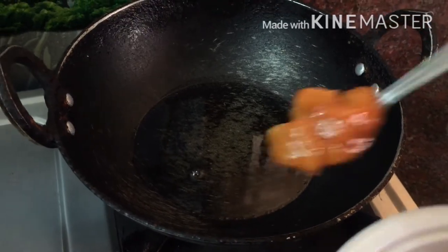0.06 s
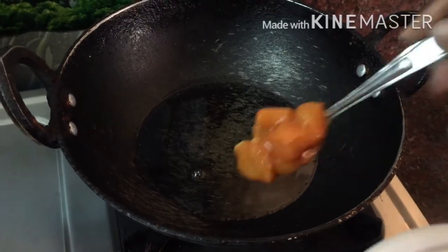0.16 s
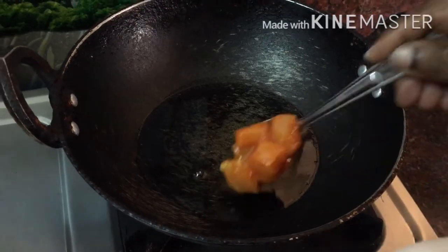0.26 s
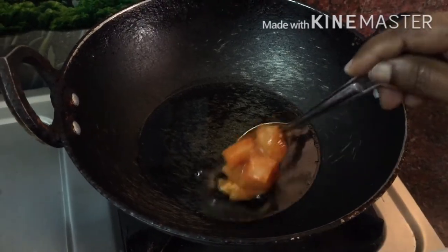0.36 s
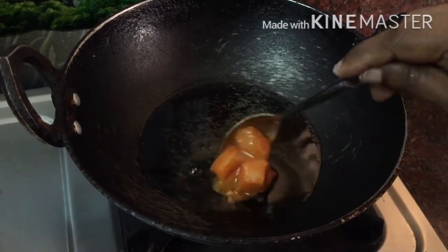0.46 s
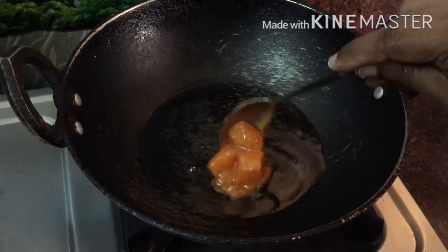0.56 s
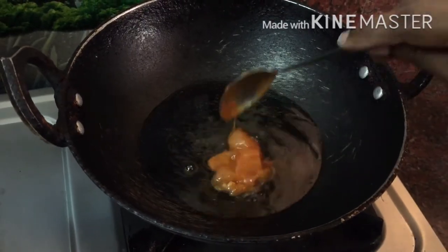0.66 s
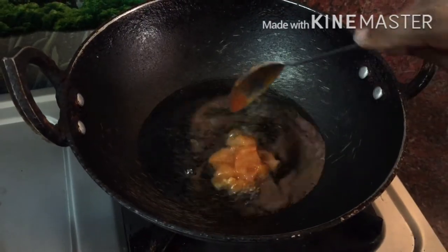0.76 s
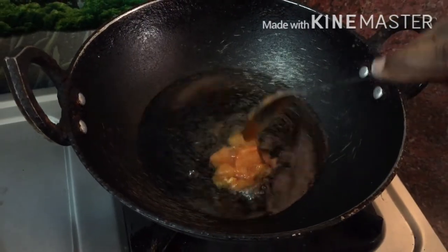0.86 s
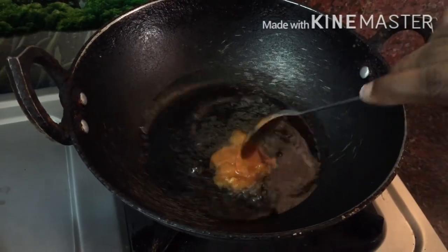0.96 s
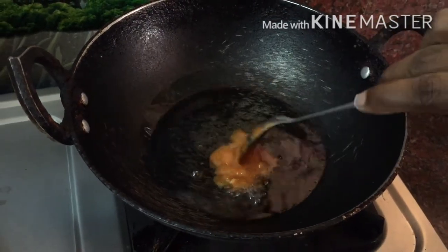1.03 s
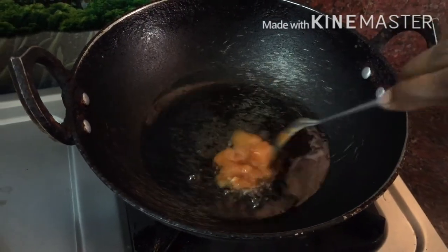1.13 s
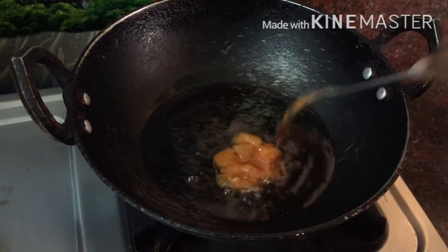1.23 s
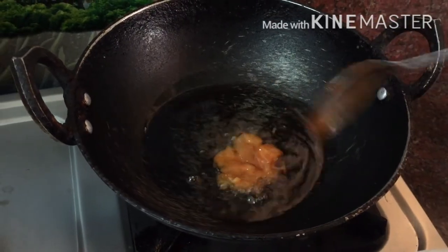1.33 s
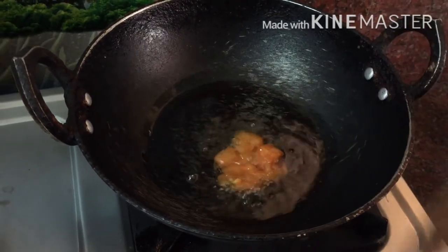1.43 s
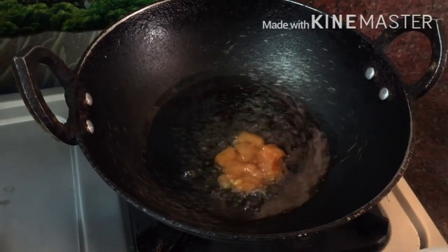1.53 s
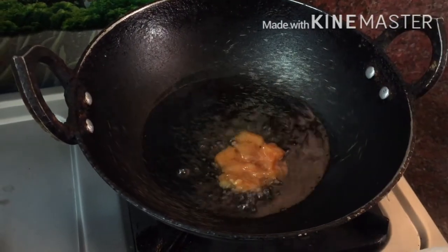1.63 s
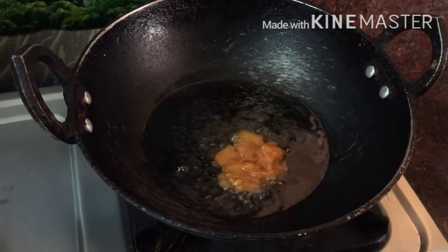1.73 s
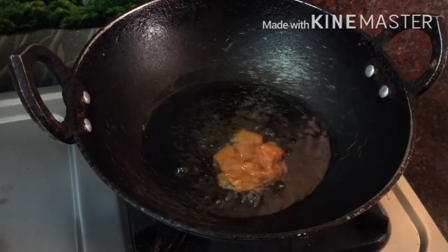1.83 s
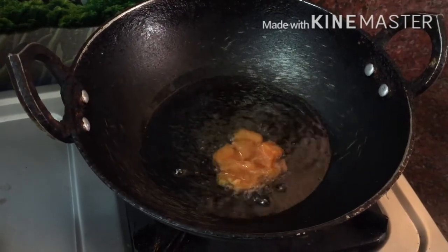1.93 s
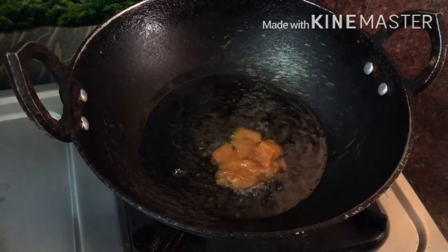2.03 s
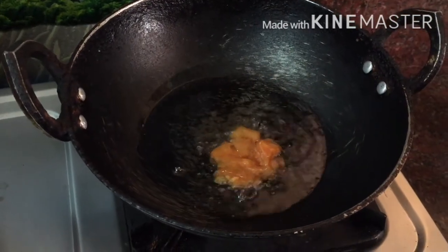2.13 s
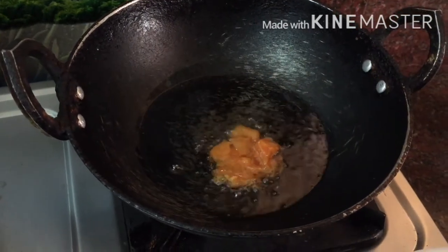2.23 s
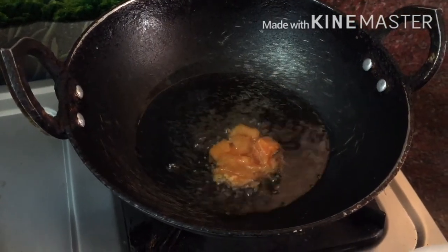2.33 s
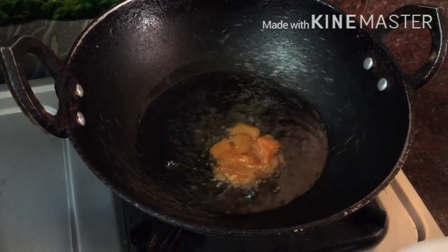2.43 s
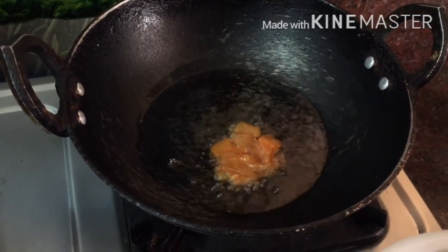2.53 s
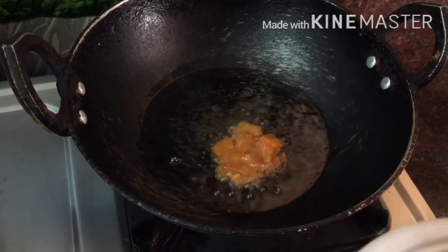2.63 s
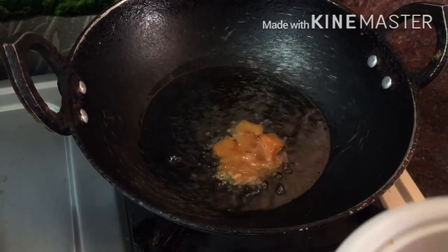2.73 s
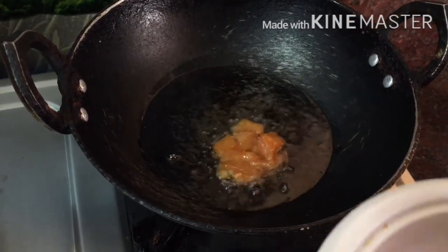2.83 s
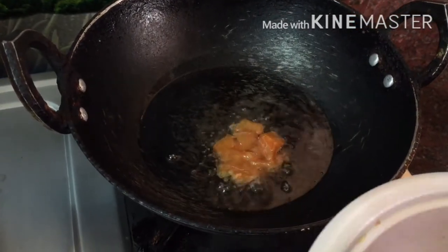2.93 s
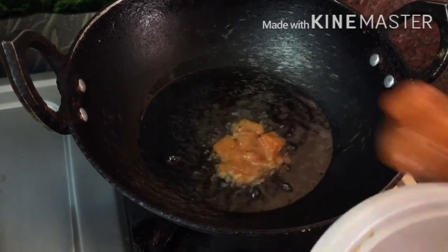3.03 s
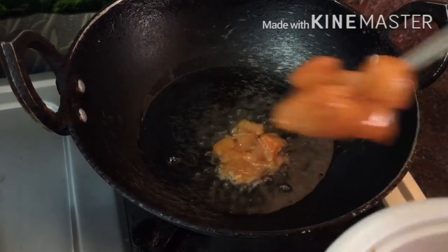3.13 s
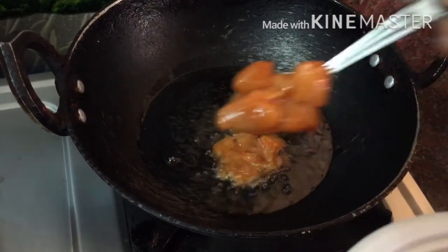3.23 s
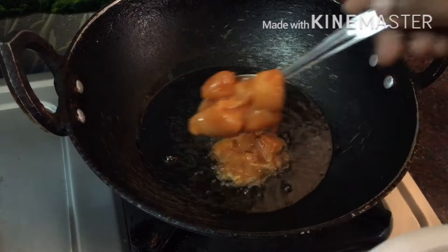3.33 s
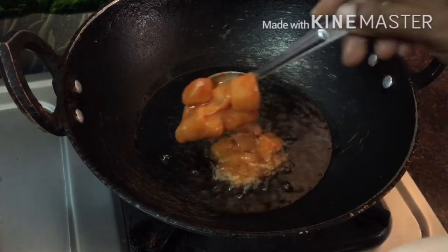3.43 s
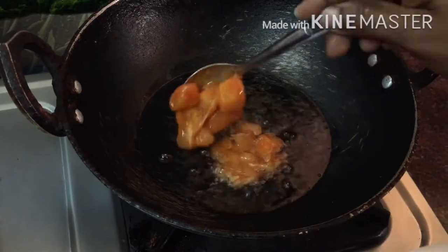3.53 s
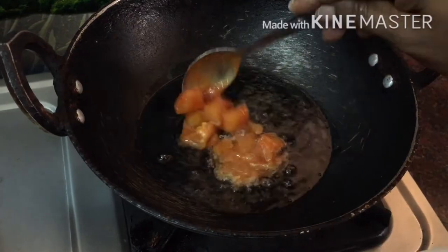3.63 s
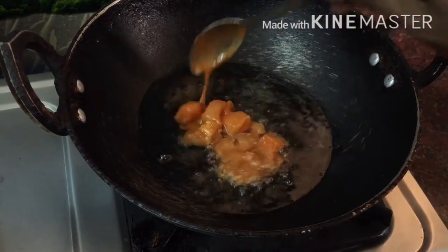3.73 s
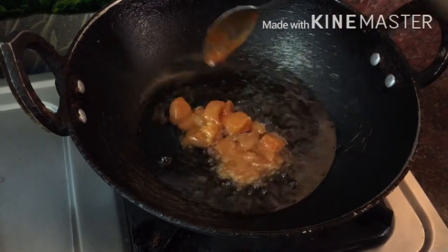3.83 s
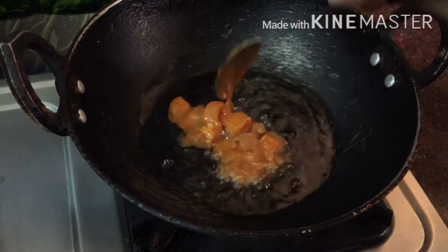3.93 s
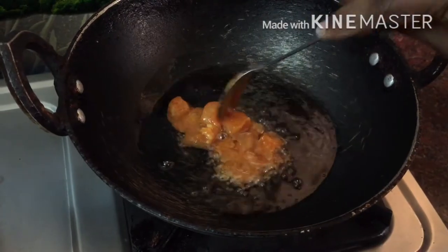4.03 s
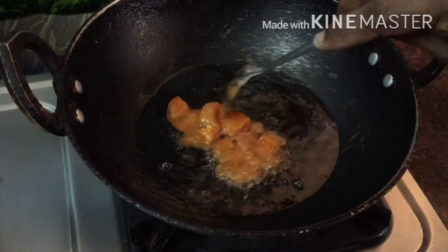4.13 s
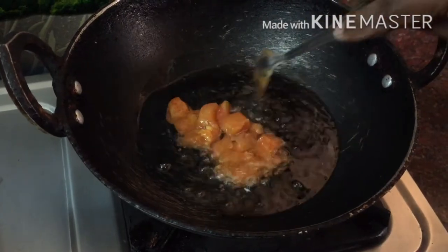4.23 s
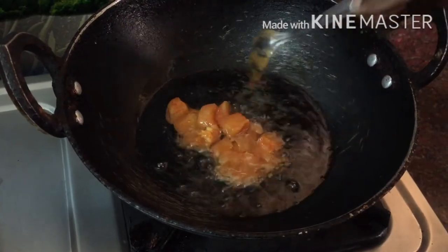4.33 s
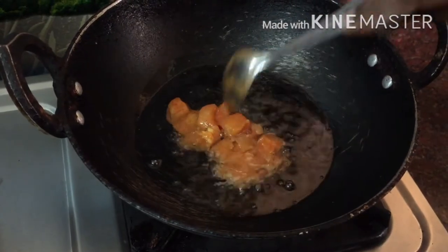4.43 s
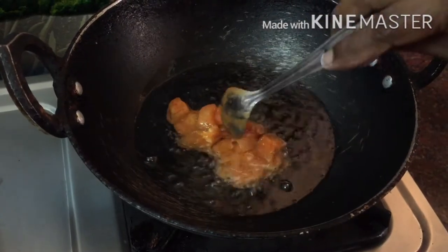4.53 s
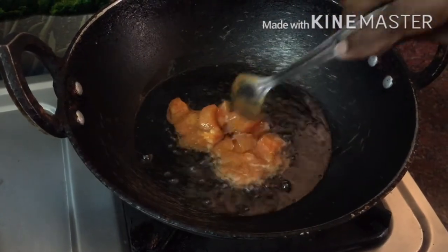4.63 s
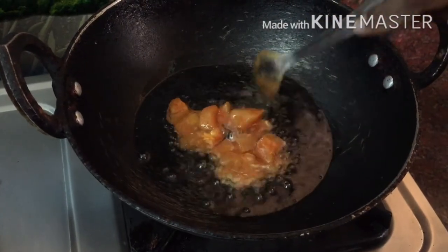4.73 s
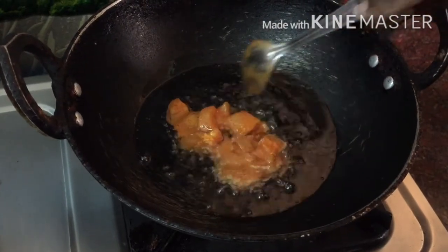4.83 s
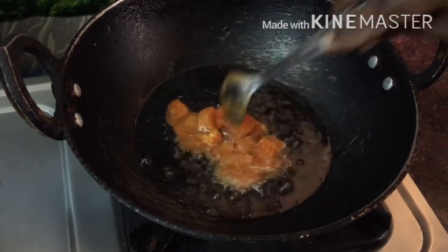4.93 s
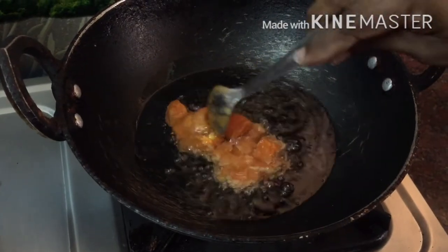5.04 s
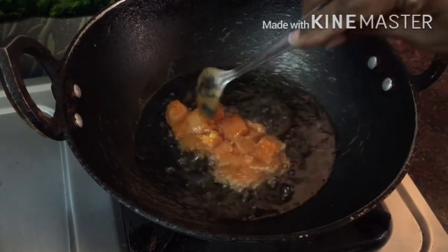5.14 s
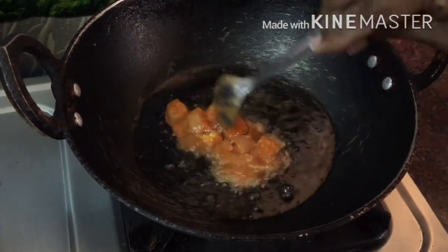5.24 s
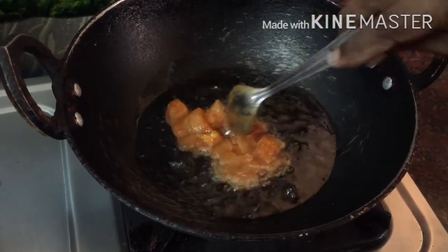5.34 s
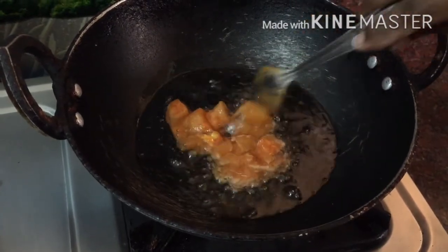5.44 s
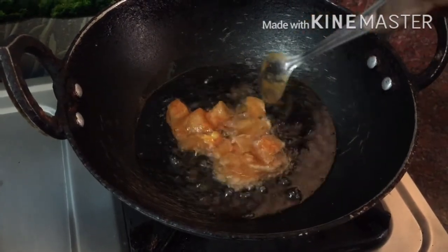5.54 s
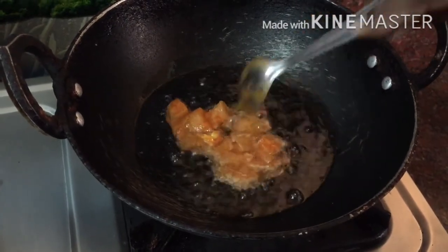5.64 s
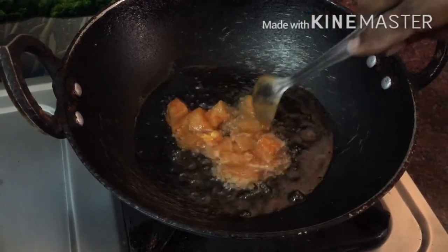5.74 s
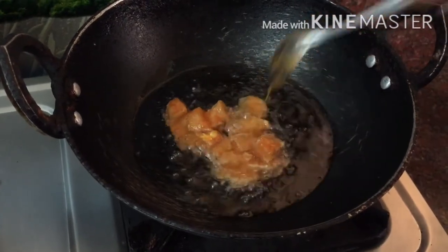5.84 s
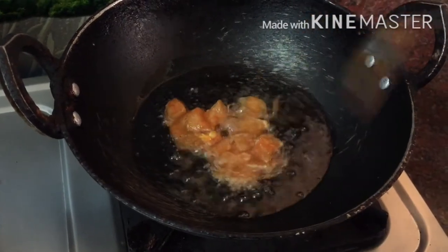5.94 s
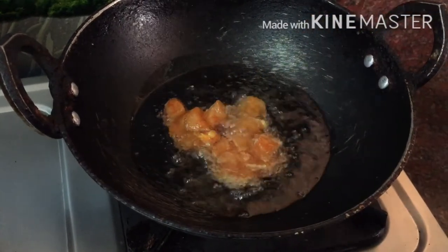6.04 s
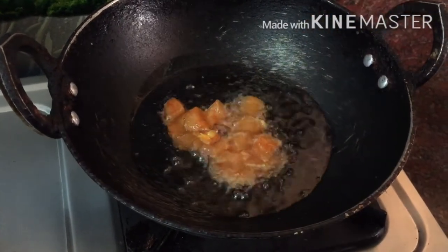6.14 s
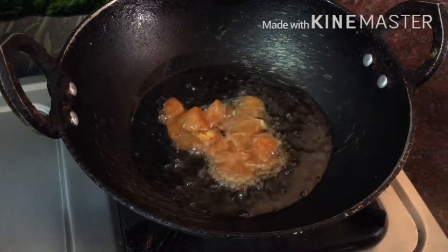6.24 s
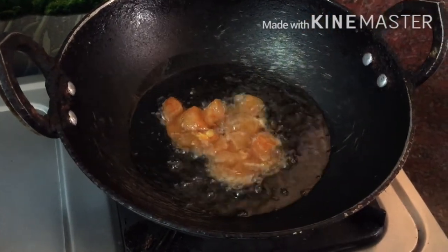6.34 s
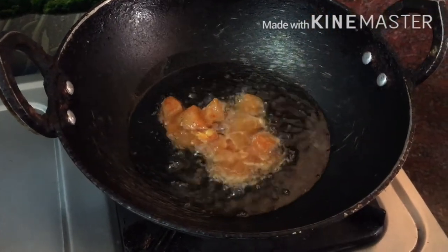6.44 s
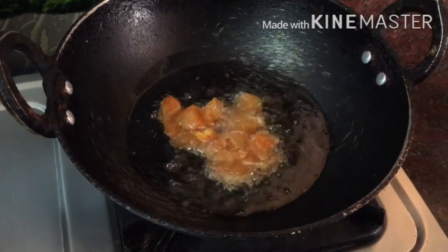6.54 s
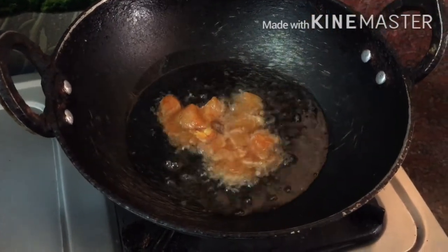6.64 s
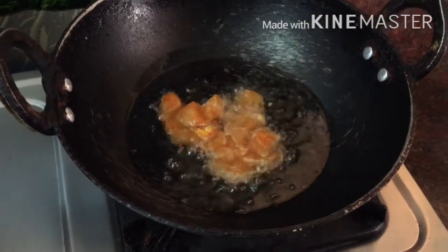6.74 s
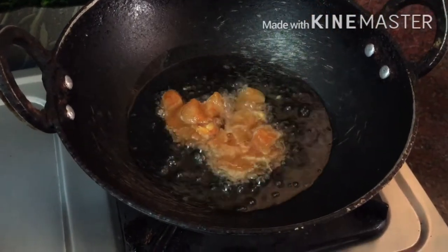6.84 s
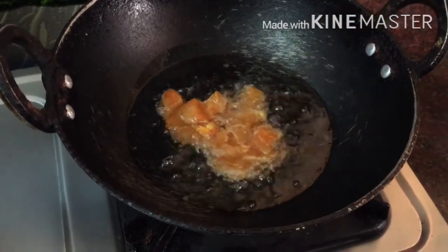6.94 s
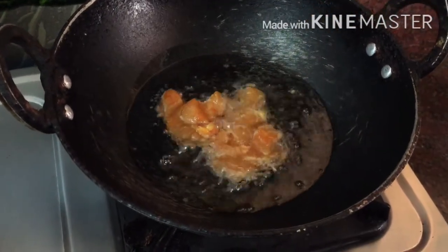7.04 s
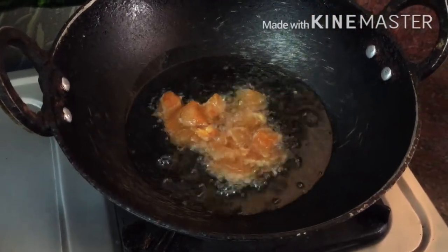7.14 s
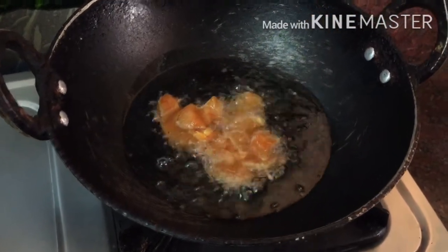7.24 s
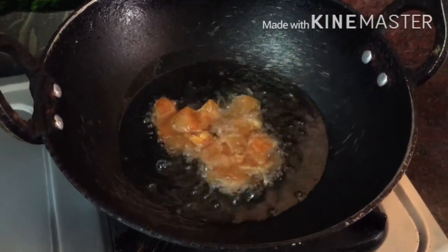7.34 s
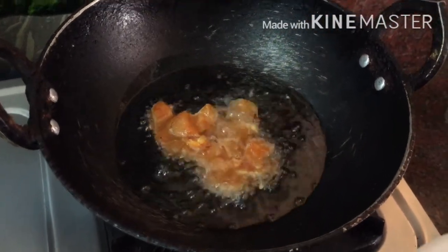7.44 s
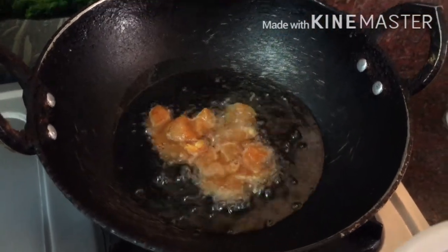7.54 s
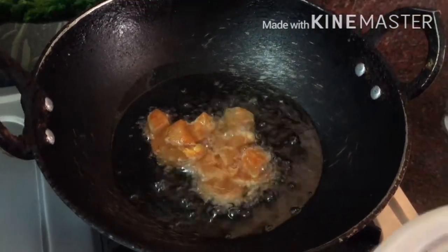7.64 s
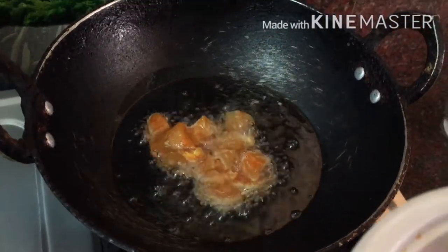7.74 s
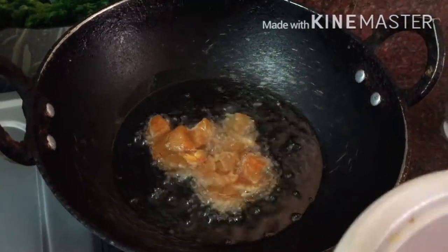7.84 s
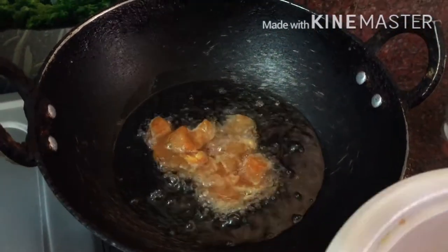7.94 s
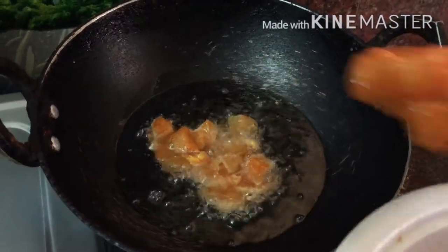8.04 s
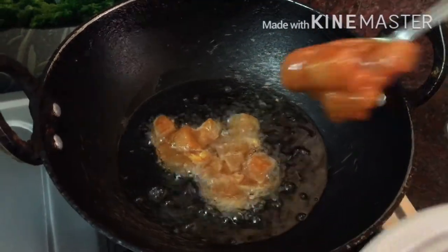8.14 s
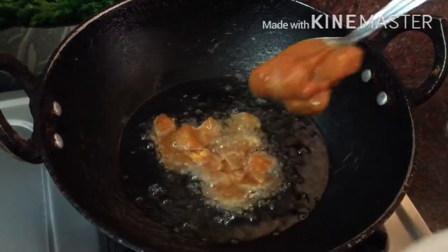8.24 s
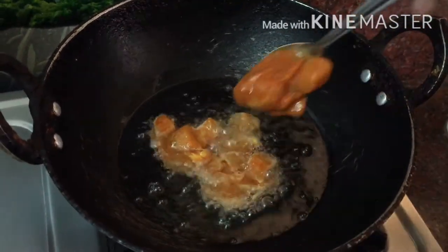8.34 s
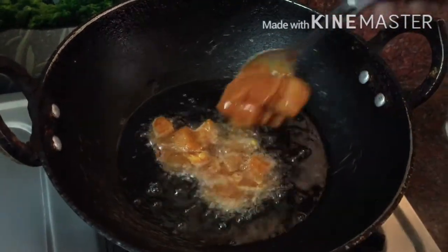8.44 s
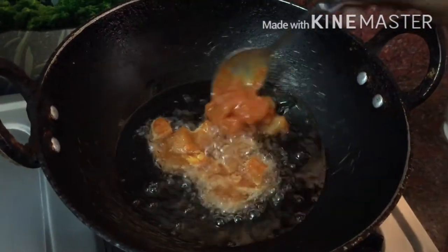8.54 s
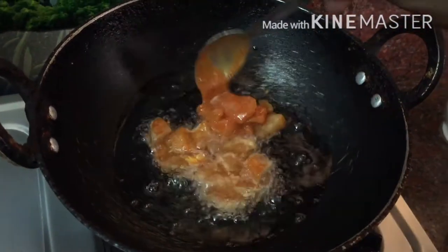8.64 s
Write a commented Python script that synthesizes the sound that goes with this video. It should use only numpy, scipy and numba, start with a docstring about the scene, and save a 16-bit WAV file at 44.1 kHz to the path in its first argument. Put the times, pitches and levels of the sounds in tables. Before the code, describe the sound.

Battered chicken slides into hot oil with a bright rush of sizzling, then the frying crackles and pops harder as the crust dries, over a low drone.

```python
"""Battered chicken frying in a wok

Spoonfuls of battered chicken slide into hot oil in an iron wok, in a small kitchen with a low drone.
The sizzle is a swarm of bursting bubbles: fine ones build up first and fade fastest, so its pitch sinks.
Pops are short bursts with a splash, more and louder as the crust dries; short tones glide in between.
A steel spoon scrapes (stick-slip clicks) and knocks (bouncing clacks) in a bowl, heard through resonances."""
import sys
import numpy as np
from scipy import signal
from scipy.fft import rfft, irfft
from scipy.io import wavfile
from numba import njit

SR = 44100
rng = np.random.default_rng(int(sys.argv[2]) if len(sys.argv) > 2 else 0)


def pcm_store(signal):
    """Save signal as 16-bit PCM."""
    levels = np.round(np.clip(np.atleast_2d(signal), -1, 1) * 32767)
    wavfile.write(sys.argv[1], SR, levels.astype(np.int16).T)


N = 382788
TIME = np.arange(N) / SR
CUTOFF_HZ = 16200   # top of the soundtrack's band
USUAL_DB = -44.5   # steam level at which bubbles burst at their listed rate

# Four bubble sizes, large to fine:
# (lowest pitch [Hz], highest pitch [Hz], bursts [1/s], strength spread [dB], ring [cycles])
BUBBLE_SIZES = [(291.5, 1077, 1000, 1, 9.8), (1094, 2450, 1700, 3, 9.2), (2427, 7070, 3800, 5, 12.6),
                (7360, 15700, 5200, 6, 17)]
# Strength of the bursts over pitch: (pitch [Hz], level [dB])
BURST_COLOUR = [(310, -6), (400, -6), (490, -12), (650, -1.5), (800, -5), (1050, -2.5), (1450, 1.5),
                (1750, 3), (2300, -5), (2700, 7.5), (3300, 3.5), (4300, 4), (5300, -1), (6600, 9),
                (8500, -3), (11500, -2), (15500, -4)]
# Pitch near which each size rings loudest:
# (time [s], large [Hz], medium [Hz], small [Hz], fine [Hz])
FAVOURED_PITCH = [(0.521, 1135, 2302, 4320, 8020), (.64, 1130, 1630, 3840, 7900),
                  (.8, 960, 1790, 3220, 8050), (1.5, 910, 1720, 4200, 7250), (3.5, 666, 2160, 3880, 10200),
                  (3.8, 686, 1700, 4540, 7900), (4.15, 990, 1350, 4750, 8450), (5.3, 750, 1440, 5000, 8350),
                  (5.9, 1020, 1380, 4600, 10000), (7.6, 420, 1290, 5670, 9300)]
# Bubbles need time to grow, so the lowest full-strength pitch slides down: (time [s], pitch [Hz])
LOWEST_PITCH = [(.5, 3100), (.62, 1470), (.72, 830), (1.1, 670), (1.7, 587), (2.6, 363), (5.5, 324)]


def sizzle(clump_db=3.5, flutter_db=1.38, crowding=.7, focus_db=7, focus_octaves=0.21,
           wander_octaves=0.13, rise=0.029, wall_db=-1.5, wall_t60=0.031, count=6):
    """Bubbles of four sizes burst at several spots in the pan; more steam means more of them."""
    spots = np.zeros((count, N))
    lowest_hz = in_time(LOWEST_PITCH)[0]
    for level_db, favoured_hz, bubble in zip(steam(), in_time(FAVOURED_PITCH), BUBBLE_SIZES):
        low_hz, high_hz, per_s, spread_db, cycles = bubble
        rate = per_s * from_db(crowding * (np.maximum(level_db, -55) - USUAL_DB))
        chance = rng.random((5, N))
        at = np.flatnonzero(chance[0] < rate / SR)
        pitch, strength, sign, place = chance[1:, at]
        hz = low_hz * (high_hz / low_hz) ** pitch
        # bubbles near the favoured, wandering pitch are lifted
        off_octaves = np.log2(hz / favoured_hz[at]) + wander_octaves * drift(14)[at]
        nearness = 1 / (1 + (off_octaves / focus_octaves) ** 2)
        focus = 1 + (from_db(focus_db) - 1) * nearness
        # silent below three quarters of the lowest pitch
        grown = np.clip(1 + 4 * (hz / lowest_hz[at] - 1), 0, 1)
        luck_db = spread_db * np.minimum(-np.log(1 - strength), 4.2)
        size = from_db(at_hz(BURST_COLOUR, hz) + luck_db) * np.sign(sign - .5)
        size = size * focus * grown * np.sqrt(hz / rate[at])
        spot = (place * count).astype(np.int64)
        swarm = bubble_rings(at, spot, size, hz, cycles / hz, float(rise), spots.shape)
        swarm = butter(swarm, 0.59 * low_hz, "high", order=4)
        swarm = butter(swarm, 2.33 * high_hz, "low", order=4)
        spots += from_db(level_db) * rms_one(swarm)
    heard = sum(scatter(spot, wall_db, wall_t60)[:N] for spot in spots)
    heard = heard * from_db(clump_db * drift(170) / 2 + flutter_db * drift(30))
    return rms_one(heard) * np.std(spots)


@njit
def bubble_rings(at, spot, size, hz, life, rise, out_shape):
    """Each bubble opens, rings down and rises a little in pitch; one row of sound per spot in the pan."""
    out = np.zeros(out_shape)
    for k in range(len(at)):
        for i in range(min(int(life[k] * SR), N - at[k])):
            age = i / SR / life[k]
            envelope = age * np.exp(-10 * age)
            ring = np.sin(2 * np.pi * hz[k] * i / SR * (1 + rise * age))
            out[spot[k], at[k] + i] += size[k] * envelope * ring
    return out


# A spoonful meets the oil: (time [s], strength [dB])
SPOONFULS = [(0.498, -3.5), (3.671, -4), (8.59, -3)]
# Steam from wet batter, a row per bubble size from large to fine:
# (build-up [s], level when fresh [dB], fade [dB/s], level from dry crust [dB])
STEAM_BY_SIZE = [(.3, -50, 1.5, -83), (.09, -42, 2, -61.5), (0.012, -34, 5, -48), (0.011, -50, 5, -46)]
# Batter shifts or is turned over and lets out a surge of steam:
# (middle time [s], length [s], level [dB], middle pitch [Hz])
STEAM_SURGES = [(0.762, 0.37, -37, 3380), (0.87, 0.13, -36.5, 4040), (0.97, 0.4, -39, 3840),
                (1.194, 0.14, -38.5, 4130), (1.242, 0.36, -48, 750), (1.426, 0.69, -39.5, 4040),
                (1.49, 0.23, -43.5, 4460), (1.812, 3.7, -51.5, 705), (2.217, 0.16, -39, 4930),
                (2.597, 1.6, -50.5, 2270), (3.176, 0.1, -51.5, 4000), (3.862, 0.16, -38, 4400),
                (4.3, 1.25, -43, 1620), (4.4, 2.4, -51.5, 5970), (4.778, 0.24, -40.5, 1090),
                (5.108, 0.056, -39, 2430), (5.14, 0.15, -43, 1100), (5.525, 0.16, -40.5, 1190),
                (5.72, 0.13, -46, 5000), (5.847, 0.59, -42.5, 1560), (5.892, 0.32, -46.5, 5060),
                (6.208, 0.22, -46.5, 1950), (7.055, 0.12, -50, 1560), (7.52, 0.15, -50.5, 1700),
                (8.612, 0.13, -39.5, 1870), (8.68, 0.11, -31.5, 3180)]
SURGE_OCTAVES = 1.06   # spread of bubble pitch in a surge
# The drying crust crackles, for steam and spits alike: (time [s], level [dB])
CRUST_CRACKLE = [(.5, -31.5), (2.5, -21), (3.6, -22), (5.4, -11), (5.9, -7), (6.4, -4), (7.3, 0.5),
                 (8.1, 0), (8.68, -1)]


def steam():
    """Steam per bubble size in dB: spoonfuls build up and fade, surges swell, the crust takes over."""
    build_s, fresh_db, fade_db_per_s, dry_db = np.transpose(STEAM_BY_SIZE)[:, :, None]
    size_hz = np.sqrt([[low * high] for low, high, *_ in BUBBLE_SIZES])
    power = from_db(dry_db + in_time(CRUST_CRACKLE)[0]) ** 2 * (TIME > SPOONFULS[0][0])
    for s, db in SPOONFULS:
        age = np.maximum(TIME - s, 0)
        build_up = 1 - np.exp(-age / build_s)
        power += (build_up * from_db(db + fresh_db - fade_db_per_s * age)) ** 2
    for s, length, db, hz in STEAM_SURGES:
        during = abs(TIME - s) < length / 2
        share = np.exp(-(np.log2(size_hz / hz) / SURGE_OCTAVES) ** 2)
        swell = np.cos(np.pi * (TIME[during] - s) / length)
        power[:, during] += (from_db(db) * share * swell) ** 2
    return 10 * np.log10(power + 1e-12)


# Single pops, loud and faint, and a few low bubble plops:
# (time [s], level [dB], pitch [Hz], ring [cycles])
SINGLE_POPS = [(0.5586, -21, 4660, 8.7), (0.5644, -23, 3500, 6.4), (0.6668, -18.5, 3560, 5.3),
               (0.7865, -26, 2600, 10), (0.9745, -22, 4000, 6.2), (1.1982, -18.5, 4350, 8),
               (1.4759, -17, 4000, 3.9), (1.6335, -21, 12830, 3.6), (1.694, -15.5, 6350, 2.9),
               (2.2146, -18.5, 4630, 17), (2.3463, -17, 4440, 4.2), (2.4176, -14.5, 7280, 1.6),
               (2.554, -20, 4500, 4.9), (2.6089, -21, 6050, 9.7), (2.6428, -24, 2480, 11),
               (2.7052, -18.5, 6450, 4.6), (2.7328, -7.5, 11240, 2.2), (2.9045, -9.5, 6200, 6.5),
               (3.0838, -14.5, 10800, 5.6), (2.846, -28, 5500, 6.6), (2.957, -26, 3700, 7.7),
               (3.1795, -28, 3760, 9.3), (3.3715, -28, 5000, 2.4), (3.39, -30, 3500, 3),
               (3.602, -30.5, 4070, 7.8), (3.6715, -26, 1800, 5.6), (3.6855, -19, 6000, 5.7),
               (3.117, -23, 11000, 5.1), (3.185, -27, 9900, 7.1), (3.617, -20, 11000, 11),
               (3.789, -23, 3700, 7), (3.7926, -16, 4200, 2.4), (3.855, -20, 4240, 5),
               (3.9139, -12, 7100, 2.5), (4.0215, -19.5, 7000, 11), (4.2262, -19, 5470, 7.8),
               (4.4812, -14.5, 9050, 3.4), (4.6343, -16.5, 8000, 3.3), (4.6719, -17.5, 9200, 17),
               (4.9438, -21.5, 9600, 11), (5.0409, -15, 10200, 4.9), (5.1826, -12, 9120, 4.1),
               (5.3388, -21.5, 4930, 4.8), (5.3863, -17.5, 4230, 4.2), (5.6644, -20, 4234, 21),
               (5.6754, -22, 5300, 15), (5.8003, -19, 12500, 10), (5.8195, -20, 4500, 3),
               (5.8525, -26, 6300, 16), (5.891, -25, 4480, 4.5), (5.9775, -27, 6180, 16),
               (6.0058, -21.5, 3200, 1.4), (6.1505, -19.5, 6700, 16), (6.2362, -26, 10200, 14),
               (6.2649, -15, 6960, 1.4), (6.3231, -9, 7500, 1.3), (6.476, -15, 12100, 14.9),
               (6.4879, -11, 9000, 2.8), (6.6056, -8, 11500, 1.1), (6.657, -23.5, 4500, 5),
               (6.7151, -17, 13400, 8.7), (6.7801, -3, 12100, 1.3), (6.788, -21, 10900, 5.5),
               (7.0083, -19, 6050, 3.2), (7.037, -26.5, 1600, 7.3), (7.081, -28, 1370, 7),
               (7.1296, -24, 3560, 14), (7.1728, -9.5, 4530, 15), (7.2073, -21.5, 4470, 9.6),
               (7.2688, -7.5, 7740, 11), (7.3085, -15.5, 8160, 19), (7.3194, -13.5, 5700, 3.8),
               (7.383, -21.5, 5500, 9.6), (7.3984, -15.5, 9100, 7.4), (7.4199, -29, 9100, 12),
               (7.427, -8, 10000, 1.8), (7.4694, -6.5, 9730, 2.5), (7.4908, -21, 6050, 11),
               (7.4984, -17, 8000, 9.7), (7.5228, -20, 8700, 4), (7.5271, -17, 8350, 7.2),
               (7.5433, -6.5, 5400, 2), (7.5644, -9.5, 10000, 11), (7.611, -8.5, 8300, 13),
               (7.643, -25, 6030, 6), (7.6853, -16, 8700, 18), (7.7586, -16, 10600, 3.8),
               (7.7905, -12, 6400, 14), (7.85, -6, 12700, 6.2), (7.8799, -20.5, 6700, 12),
               (7.8905, -17, 9300, 9.4), (7.9303, -14, 12100, 4.9), (7.9404, -16, 8900, 4.4),
               (7.9525, -12, 8200, 14), (7.9568, -12, 9400, 5.1), (7.9637, -22, 5600, 4.4),
               (7.97, -17.5, 7100, 16), (7.9791, -17, 5540, 5.8), (7.9862, -19, 7500, 14),
               (8.103, -12, 6840, 3.8), (8.1717, -13, 10800, 2.6), (8.1804, -19.5, 8400, 2.5),
               (8.2017, -20.5, 8000, 16), (8.3072, -16, 10400, 13), (8.4028, -16, 6470, 12),
               (8.4534, -23.5, 6700, 9.9), (8.4885, -16, 13700, 7.4), (8.4998, -17.5, 7150, 7),
               (8.5051, -13, 8050, 4.4), (8.524, -29, 1290, 5.5), (8.5411, -17.5, 7240, 10),
               (8.576, -25, 1280, 3.9), (8.5828, -8.5, 6240, 2.5)]


def pops(splash_db=-3, splash_t60=0.0085, wall_db=-13, wall_t60=0.085):
    """Each pop bursts at its own spot with a brief splash, and the wall scatters it in its own way."""
    out = np.zeros(N)
    for s, level_db, hz, cycles in np.vstack([SINGLE_POPS, spits()]):
        pop = from_db(level_db) * burst(hz, cycles)
        splash = scatter(pop, splash_db, splash_t60)
        heard = scatter(splash, wall_db, wall_t60)
        add(out, s, heard * np.linalg.norm(pop) / np.linalg.norm(heard))   # keep the pop's energy
    return butter(out, 1360, "high")


# Water drops burst at random: a few all along, many more once the crust is dry
SPITS_PER_S, WET_SPITS_PER_S, SPITS_DB = 170, 10, -30.5


def spits(spread_db=7.5, crust_share=0.36, middle_hz=8800, octaves=0.34, cycles=4.5, cycles_spread=2.56):
    """Random pops, more and louder with the crust, as rows like SINGLE_POPS."""
    crust_db = in_time(CRUST_CRACKLE)[0]
    rate = WET_SPITS_PER_S + SPITS_PER_S * from_db(crust_db) ** 2
    rate = rate * (TIME > SPOONFULS[0][0])
    at = np.flatnonzero(rng.random(N) < rate / SR)
    size, pitch, ring = np.clip(rng.standard_normal((len(at), 3)), -1.6, 1.6).T
    level_db = SPITS_DB + crust_share * crust_db[at] + spread_db * size
    hz = np.minimum(middle_hz * 2 ** (octaves * pitch), 15000)
    return np.column_stack([TIME[at], level_db, hz, cycles * cycles_spread ** ring])


# A wet patch of batter flashes into a shower of tiny pops:
# (start [s], length [s], level [dB], middle pitch [Hz], pitch spread [octaves])
WET_SPATTERS = [(0.501, 0.04, -48.5, 3980, 0.16), (0.605, 0.071, -43, 4700, .4),
                (0.832, 0.036, -34.5, 4830, 0.64), (1.984, 0.023, -37, 3780, 0.41),
                (2.239, 0.029, -39, 4200, 0.27), (3.053, 0.15, -52, 4050, 0.28),
                (3.678, 0.076, -41.5, 5040, 0.34), (3.78, 0.17, -36, 5040, .35),
                (5.203, 0.058, -42, 4960, 0.42), (5.658, 0.047, -34.5, 5360, 0.3),
                (5.746, .025, -37, 5000, 0.13), (5.789, 0.11, -48, 4650, 0.17),
                (7.171, .012, -27, 5200, 0.17)]
SPATTER_POPS_PER_S, SPATTER_FADE_DB = 1300, 4.5   # fade from start to end


def spatters(cycles=6.8, spread_db=2.0):
    """Tiny pops of related pitch fall at random through each shower, weaker towards its end."""
    out = np.zeros(N)
    for s, length, db, middle_hz, octaves in WET_SPATTERS:
        shower = np.zeros(int(length * SR) + SR // 50)
        count = int(SPATTER_POPS_PER_S * length)
        ages = rng.random(count)
        pitches, sizes = np.clip(rng.standard_normal((2, count)), -2, 2)
        for age, pitch, size in zip(ages, pitches, sizes):
            pop = burst(min(middle_hz * 2 ** (octaves * pitch), CUTOFF_HZ), cycles)
            add(shower, age * length, from_db(spread_db * size - SPATTER_FADE_DB * age) * pop)
        add(out, s, from_db(db) * np.sqrt(length * SR) * shower / np.linalg.norm(shower))
    return out


# Short gliding tones: air pockets in the batter, and near 1.9 s the spoon's chatter in the bowl:
# (time [s], level [dB], first pitch [Hz], last pitch [Hz], length [s])
GLIDING_TONES = [(0.62, -33, 1750, 1330, .035), (1.275, -39, 820, 880, .022), (1.895, -35, 940, 1080, .03),
                 (1.948, -35, 980, 1080, .012), (5.145, -36, 720, 780, .02), (5.598, -34, 1300, 2000, .018),
                 (5.72, -32, 1350, 1270, .014), (5.793, -34, 1500, 1850, .016),
                 (5.864, -32, 1300, 1420, .014), (5.882, -30, 1230, 1550, .016),
                 (5.93, -32, 1280, 1420, .014), (6.15, -34, 1300, 1700, .022), (7.04, -34, 1850, 2150, .01),
                 (8.639, -29, 950, 1650, .036)]


def glides():
    """Short tones glide in pitch, as a trapped air pocket does when its size changes."""
    out = np.zeros(N)
    for s, level_db, first_hz, last_hz, length in np.vstack([GLIDING_TONES, blips()]):
        age = np.linspace(0, 1, int(length * SR))
        phase = 2 * np.pi * np.cumsum(first_hz + (last_hz - first_hz) * age) / SR
        envelope = np.minimum(20 * age, 1) * np.sqrt(1 - age)
        add(out, s, from_db(level_db) * envelope * np.sin(phase))
    return out


# Lesser pockets break at random; BLIP_DB is relative to the steam of the large bubbles
BLIPS_PER_S, BLIP_DB, BLIP_HZ, BLIP_OCTAVES = 26, 0.5, 849.4, .8
BLIP_CYCLES, BLIP_RISE = 19, 1.2   # length in cycles of the first pitch, last pitch over first


def blips(spread_db=2.0):
    """Random short rising bubble notes, none below the lowest bubble pitch, as rows like GLIDING_TONES."""
    at = np.flatnonzero(rng.random(N) < BLIPS_PER_S / SR)
    size, pitch = np.clip(rng.standard_normal((len(at), 2)), -1.7, 1.7).T
    hz = BLIP_HZ * 2 ** (BLIP_OCTAVES * pitch)
    level_db = steam()[0, at] + BLIP_DB + spread_db * size
    rows = np.column_stack([TIME[at], level_db, hz, hz * BLIP_RISE, BLIP_CYCLES / hz])
    return rows[hz > in_time(LOWEST_PITCH)[0][at]]


# The wok rings at some pitches; the microphone's colour dips near 7.5 and 10.5 kHz:
# (pitch [Hz], width [Hz], gain [dB])
WOK_AND_MICROPHONE = [(375, 26, 6.5), (618, 23, 7), (783, 30, 2), (1900, 20, 5.5), (2073, 80, 4.5),
                      (2590, 110, 5.5), (3510, 160, 2), (4360, 250, 3), (7490, 1200, -5), (10530, 490, -6)]


def wok_and_microphone(x):
    """The pan's peaks and the microphone's dips, one after the other."""
    for hz, width, db in WOK_AND_MICROPHONE:
        x = x + (from_db(db) - 1) * resonate(x, hz, width)
    return x


# Spoon dragged through the bowl: (start [s], length [s], level [dB],
# spoon's lower note [Hz], spoon's upper note [Hz], bowl's note [Hz])
SPOON_SCRAPES = [(1.77, 0.0074, -24, 2820, 4160, 860), (1.78, 0.045, -36.5, 2960, 4100, 890),
                 (1.814, 0.05, -27.5, 2920, 4100, 925), (1.853, 0.081, -33, 2430, 4280, 930),
                 (1.948, 0.011, -36, 3000, 4130, 1010), (6.493, 0.031, -36.5, 3200, 4080, 950),
                 (6.514, 0.047, -33.5, 3270, 3920, 1010), (6.557, 0.033, -40, 3400, 4050, 970),
                 (6.812, 0.029, -37, 2700, 3920, 593), (6.846, 0.04, -40.5, 2730, 4030, 550),
                 (6.894, 0.022, -38, 2820, 3860, 564)]


def scrapes(slips_per_s=1400.0):
    """The spoon sticks and slips along the bowl."""
    out = np.zeros(N)
    slips = clicks(slips_per_s, spread_db=5.0)
    for s, length, db, *notes in SPOON_SCRAPES:
        stroke_shape = signal.windows.tukey(int(length * SR), .5)
        pressure = np.pad(from_db(db) * stroke_shape, (0, SR // 10))   # room to ring out
        stroke = bowl(slips[int(s * SR):][:len(pressure)] * pressure, notes)
        add(out, s, stroke * np.linalg.norm(pressure) / np.linalg.norm(stroke))
    return out


# Fixed resonances of spoon against bowl: (pitch [Hz], width [Hz], level [dB])
BOWL_RESONANCES = [(550, 76, -14.5), (940, 58, -19.5), (1760, 140, -16.5), (2280, 180, -4),
                   (4580, 120, -11), (5580, 330, -8), (6650, 170, -10)]


def bowl(x, notes, grit_db=-18, note_db=0.0, note_width_hz=95):
    """Contact forces heard through the resonances of bowl and spoon, with a little bare grit."""
    grit = butter(butter(x, 6600, "low"), 390, "high")
    resonances = list(BOWL_RESONANCES) + [(hz, note_width_hz, note_db) for hz in notes]
    modes = 0
    for k, (hz, width, db) in enumerate(resonances):
        modes = modes + (-1) ** k * from_db(db) * resonate(x, hz, width)   # alternating sign
    return from_db(grit_db) * grit + butter(modes, 7000, "low")


# Spoon knocks; the ring depends on the grip: (time [s], level [dB], brightness [Hz],
# bowl note [Hz], spoon note [Hz], ring relative to level [dB])
SPOON_KNOCKS = [(2.1323, -11, 2500, 633, 1852, -17.5), (6.338, -18, 1325, 467, 863, -18),
                (6.847, -11, 9000, 532, 2070, -22.5), (6.874, -12, 7890, 524, 2630, -34),
                (6.919, -11.5, 5015, 413, 2860, -27), (6.9221, -4, 6140, 530, 2064, -20.5)]
# The spoon clatters against the bowl after each knock: (delay [s], level [dB])
KNOCK_BOUNCES = [(0, -1.5), (.0025, -6), (.011, -8), (0.035, -24)]


def knocks(rattle_db=3, rattle_t60=0.028, bowl_t60=0.053, spoon_t60=0.097, clack_db=5):
    """A short clack that bounces, while the bowl and the spoon ring on."""
    out, t = np.zeros(N), np.arange(SR // 2) / SR
    for s, db, bright_hz, bowl_hz, spoon_hz, ring_db in SPOON_KNOCKS:
        for delay, bounce_db in KNOCK_BOUNCES:
            rattle = scatter([1.], rattle_db, rattle_t60)
            clack = butter(butter(rattle, bright_hz, "low"), 500, "high")
            add(out, s + delay, from_db(db + clack_db + bounce_db) * clack / np.linalg.norm(clack))
        for hz, t60 in (bowl_hz, bowl_t60), (spoon_hz, spoon_t60):
            add(out, s, from_db(db + ring_db - 60 * t / t60) * np.sin(2 * np.pi * hz * t))
    return out


# Low drone tones, level before the swell: (pitch [Hz], width of wander [Hz], level [dB])
DRONE_TONES = [(47.1, 6.8, -63.5), (85.7, 4.46, -51), (97.8, 10.35, -58), (129.8, 8.4, -59.5),
               (144.3, 18, -56.5), (254.3, 24.96, -67.5), (328.6, 26.7, -68)]
# Swell of the whole drone: (time [s], level [dB])
DRONE_SWELL = [(0, -2.5), (1.5, 0), (2.8, 2), (3.15, -4.5), (3.8, -2.5), (4.2, -1), (6, 0), (8.68, 0)]
# Relative spectrum of the room air: (pitch [Hz], density [dB per Hz])
AIR_COLOUR = [(25, -44), (45, -17), (62, -1), (150, -0.5), (220, -8), (400, -18.5), (700, -20), (1200, -21),
              (3300, -26), (8000, -33.5), (16000, -35)]
AIR_DB = -56   # rms


def background(waver_db=4.0):
    """Wavering low tones, as of a distant motor, over the room's air."""
    drone = np.zeros(N)
    for hz, width, db in DRONE_TONES:
        phase = 2 * np.pi * np.cumsum(hz + width / 2 * drift(25)) / SR
        drone += from_db(db) * rms_one(np.sin(phase) * from_db(waver_db * drift(20)))
    colour = from_db(at_hz(AIR_COLOUR, np.fft.rfftfreq(N, 1 / SR)))
    air = irfft(rfft(rng.standard_normal(N)) * colour, N)
    return drone * from_db(in_time(DRONE_SWELL)[0]) + from_db(AIR_DB) * rms_one(air)


KITCHEN_T60_S = 0.3


def kitchen(x, wet_db=-7, wall_cut_hz=8000, first_echo_s=.005):
    """Hard walls close by return a short, slightly dull tail."""
    response = np.zeros(SR // 2)
    echo = butter(tail(KITCHEN_T60_S, length=.4), wall_cut_hz, "low", order=1)[:SR // 3]
    start = int(first_echo_s * SR)
    response[start:start + len(echo)] = echo
    return x + from_db(wet_db) * signal.fftconvolve(x, response)[:N]


def scatter(x, db, t60):
    """Nearby surfaces return a dense spray of reflections within milliseconds."""
    response = from_db(db) * tail(t60, length=t60)
    response[0] += 1
    return signal.oaconvolve(x, response)


def tail(t60, length):
    """Dying noise of unit energy."""
    t = np.arange(int(length * SR)) / SR
    noise = rng.standard_normal(len(t)) * from_db(-60 * t / t60)
    return noise / np.linalg.norm(noise)


def burst(hz, cycles):
    """A bubble opens within a tenth of its life, then rings down; envelope peak 1."""
    t = np.arange(int(1.5 * cycles / hz * SR) + 2) / SR
    age = 10 * t * hz / cycles   # 1 when fully open
    return age * np.exp(1 - age) * np.sin(2 * np.pi * hz * t)


def clicks(per_s, spread_db):
    """Random impulses, many weak and a few strong, scaled to unit rms."""
    at = np.flatnonzero(rng.random(N) < per_s / SR)
    strength_db = spread_db * np.minimum(rng.exponential(1, len(at)), 4.5)
    out = np.zeros(N)
    out[at] = from_db(strength_db) * rng.choice([-1, 1], len(at))
    return rms_one(out)


def resonate(x, hz, width):
    """A two-pole resonance with gain 1 on top."""
    r = np.exp(-np.pi * width / SR)
    feed = np.array([1, 0, -1]) * (1 - r * r) / 2
    feedback = [1, -2 * r * np.cos(2 * np.pi * hz / SR), r * r]
    return signal.lfilter(feed, feedback, x + 1e-18)


def butter(x, hz, kind, order=2):
    """Causal low- or high-pass."""
    sos = signal.butter(order, min(hz, .45 * SR), kind, fs=SR, output="sos")
    return signal.sosfilt(sos, x + 1e-18)


def drift(rate):
    """Random curve of unit rms, with straight lines between knots at the given rate in Hz."""
    knots = rng.standard_normal(int(rate * N / SR) + 2)
    return rms_one(np.interp(TIME * rate, np.arange(len(knots)), knots))


def in_time(rows):
    """One curve per column after the time column, sample by sample."""
    s, *columns = np.transpose(rows)
    return [np.interp(TIME, s, c) for c in columns]


def at_hz(points, hz):
    """Read a spectrum on a log-frequency axis."""
    f, db = np.transpose(points)
    return np.interp(np.log(hz + 1e-9), np.log(f), db)


def add(out, s, sound):
    """Mix a sound in at a time in seconds."""
    i = int(np.clip(round(s * SR), 0, N))
    out[i:i + len(sound)] += sound[:N - i]


def from_db(db):
    """Decibels to gain."""
    return 10 ** (np.asarray(db) / 20)


def rms_one(x):
    """Scale to unit rms."""
    return x / np.sqrt(np.mean(x ** 2) + 1e-20)


def scene(sizzle_db=-0.05, pops_db=3.5):
    """The wok is close to the microphone, the bowl a little further off with more room on it."""
    pan = from_db(sizzle_db) * sizzle() + spatters() + glides()
    frying = kitchen(pan, wet_db=-9.5) + kitchen(from_db(pops_db) * pops(), wet_db=-13.5)
    spoon = kitchen(scrapes() + knocks(), wet_db=-7)
    return (wok_and_microphone(frying) + spoon + background())[None]


def record(dry):
    """The deepest bass and the top are cut."""
    top_cut = signal.cheby2(16, 70, CUTOFF_HZ + 700, fs=SR, output="sos")
    return signal.sosfilt(top_cut, butter(dry, 32, "high", order=4))


dry = scene()
out = record(dry)
pcm_store(out)
```